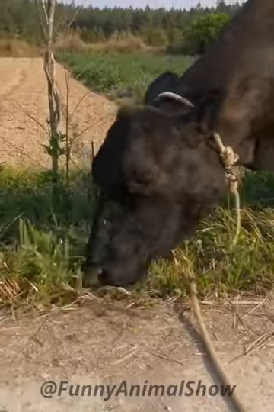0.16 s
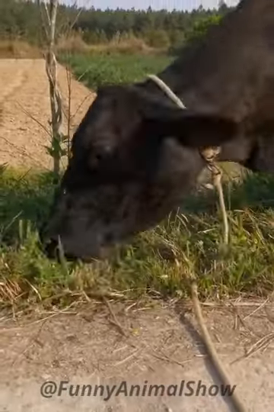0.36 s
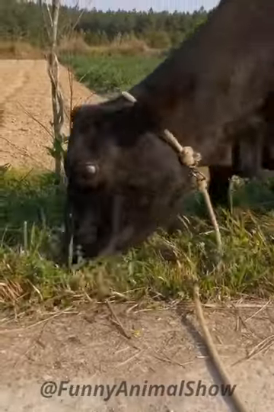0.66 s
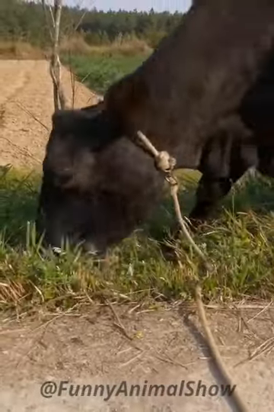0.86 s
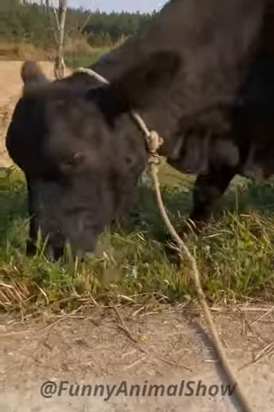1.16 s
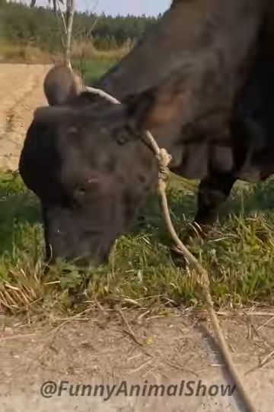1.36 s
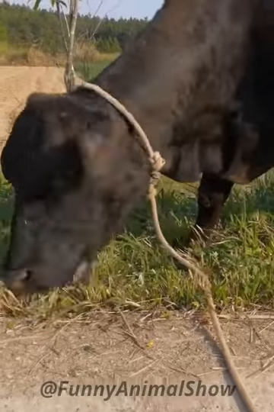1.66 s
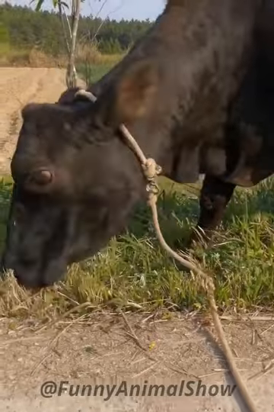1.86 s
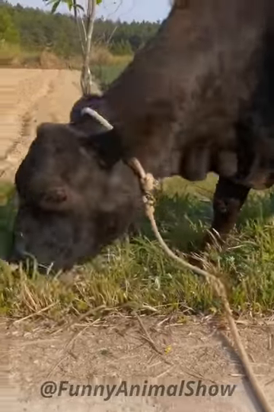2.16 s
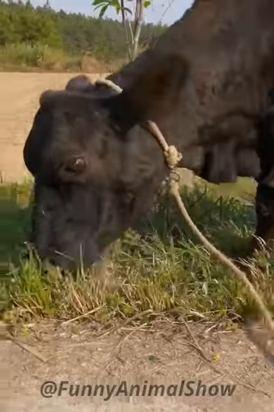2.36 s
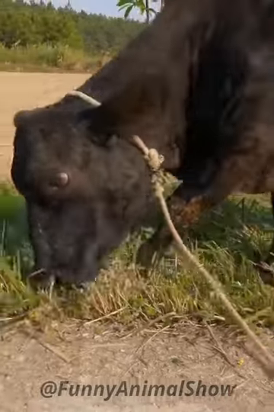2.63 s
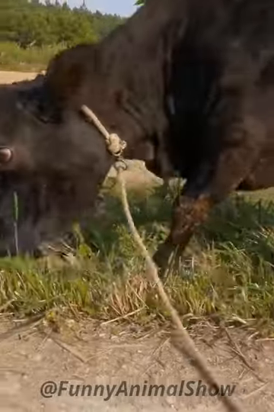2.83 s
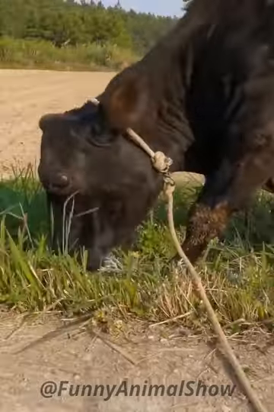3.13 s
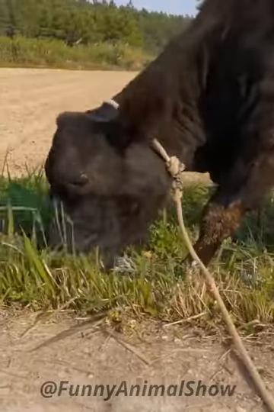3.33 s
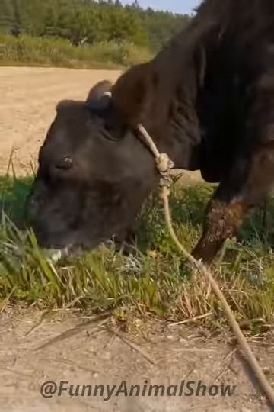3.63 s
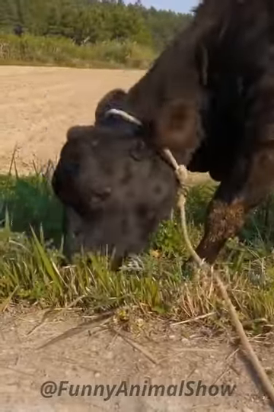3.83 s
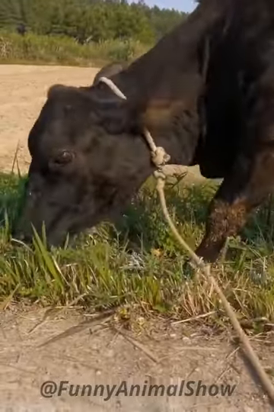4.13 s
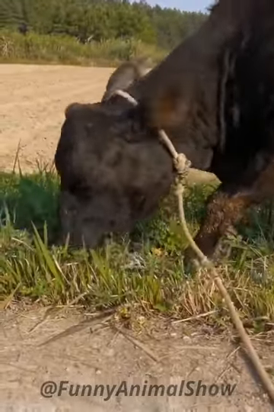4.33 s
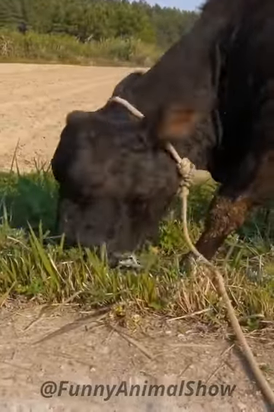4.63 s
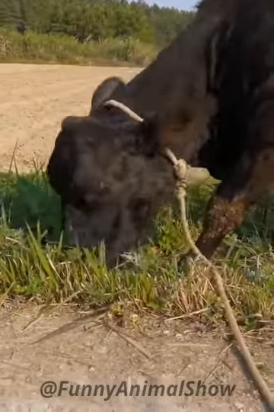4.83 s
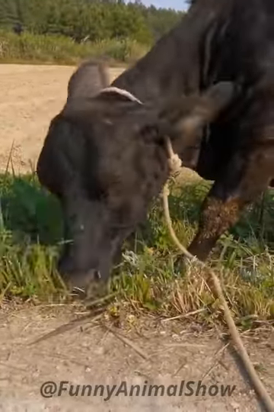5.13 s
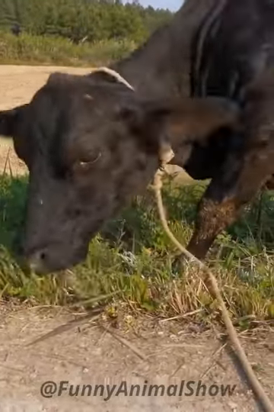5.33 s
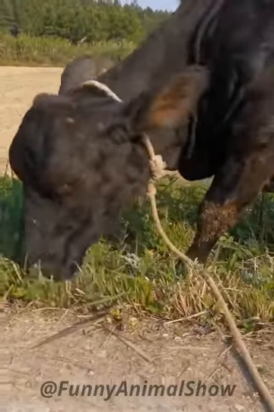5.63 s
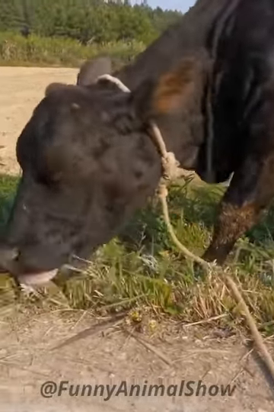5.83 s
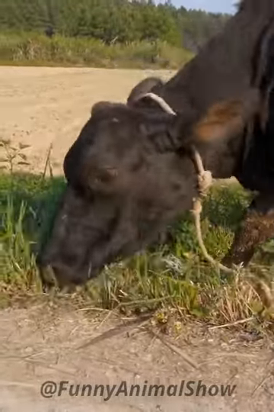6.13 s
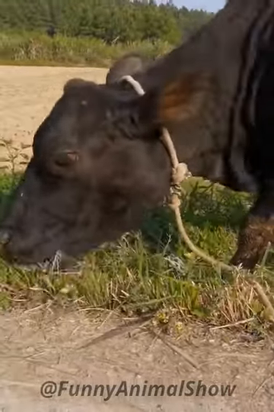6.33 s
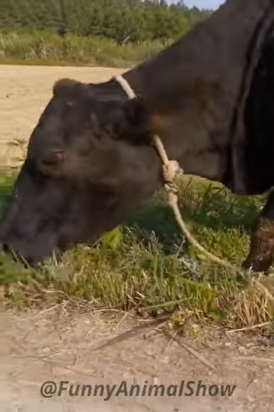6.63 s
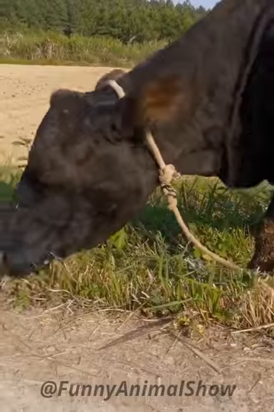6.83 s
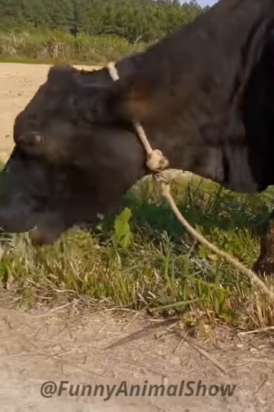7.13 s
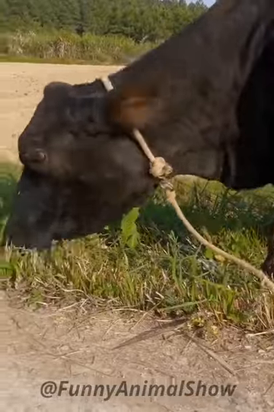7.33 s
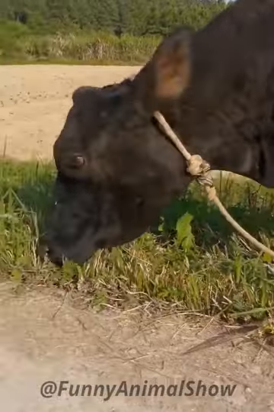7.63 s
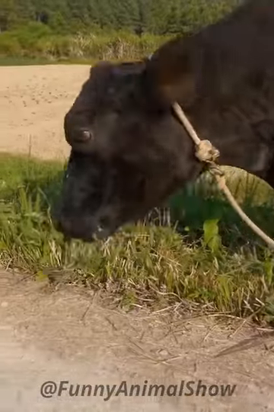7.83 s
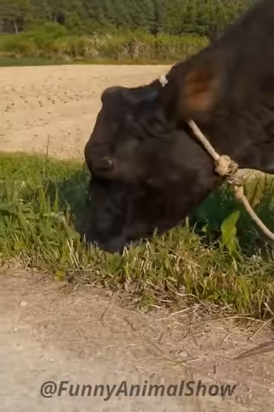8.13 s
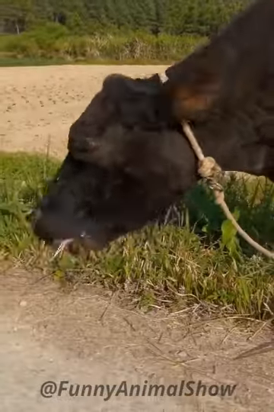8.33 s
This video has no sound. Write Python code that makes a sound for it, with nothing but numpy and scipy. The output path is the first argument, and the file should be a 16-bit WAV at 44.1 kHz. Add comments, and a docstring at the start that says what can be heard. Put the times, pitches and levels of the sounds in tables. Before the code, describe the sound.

Quick, uneven rips and crunches run throughout as a cow crops grass close by, a little to the left. Bright cracks of breaking stalks, hollow root pops and soft jaw bumps punctuate the tearing, with rustling blades in between and low puffs of breath from the animal's nose roughly every second. The field is open and free of echo, with only faint air, stirring grass and a light wind rumble on the microphone behind the feeding.

```python
"""A cow grazes close by in an open field. From the start it tears off tufts, two or three a second:
each rip is a crowd of snapping fibres with a crunch in the mouth, and between rips the muzzle sweeps
through the blades. Near 0.5 s a thick stalk cracks sharply and the nostrils begin to blow into the turf,
about once a second. More stalks splinter, roots pop and the jaw thuds softly; the strongest pop and thud
land at 6.8 s, the last rip at 8.4 s. Faint air, stirring grass and a low breeze lie under it all."""
import sys
import numpy as np
from scipy import signal
from scipy.fft import rfft, irfft, next_fast_len
from scipy.io import wavfile
from scipy.ndimage import uniform_filter1d, map_coordinates

SR = 44100
rng = np.random.default_rng(int(sys.argv[2]) if len(sys.argv) > 2 else 0)


def wav_record(signal):
    """Record a signal, one row per channel, as 16-bit PCM in the file named by sys.argv[1]."""
    frames = np.transpose(np.atleast_2d(signal))
    bounded = np.clip(frames, -1, 1)
    # unit amplitude maps onto the largest positive 16-bit level
    quanta = np.round(bounded * 32767).astype(np.int16)
    wavfile.write(sys.argv[1], SR, quanta)


N = 374276

# tufts torn off: (start [s], hold [s], rip level [dB], mouth crunch level [dB])
TUFT_RIPS = [(0.08, 0.013, -43.5, -52), (0.466, 0.04, -35, -45), (0.883, 0.013, -31.5, -52.5),
             (1.293, 0.0044, -32.5, -47.5), (1.463, 0.049, -43.5, -56), (1.666, 0.02, -35, -48.5),
             (2.052, 0.043, -35.5, -45), (2.485, 0.055, -41, -56), (2.896, 0.015, -37, -43.5),
             (3.329, 0.0069, -40, -48), (4.121, 0.062, -40.5, -42), (4.645, 0.038, -43.5, -54.5),
             (4.816, 0.02, -46, -81), (5.038, 0.069, -39, -47), (5.462, 0.039, -33.5, -40.5),
             (5.875, 0.014, -38.5, -53), (6.296, 0.085, -38, -54), (6.771, 0.0049, -35, -47.5),
             (7.163, 0.023, -40.5, -53), (7.552, 0.0078, -37.5, -49.5), (7.922, 0.073, -36, -42.5),
             (8.365, 0.0071, -35.5, -45)]
# thick stalks cracking: (time [s], level [dB], pitch [Hz])
STALK_CRACKS = [(.417, -28, 10000), (0.459, -14, 10200), (0.882, -30, 7450), (1.3026, -20.5, 9500),
                (2.073, -31, 5970), (2.0886, -20.5, 10100), (3.32, -28, 8200), (3.941, -32, 9000),
                (4.13, -29, 6000), (4.184, -28, 7060), (4.832, -36, 9000), (5.025, -30, 4960),
                (5.063, -27, 6960), (5.114, -27.5, 8100), (5.478, -21, 9700), (5.896, -21, 9200),
                (6.334, -27, 8000), (6.752, -26, 4930), (7.166, -33, 7000)]
# tone of breaking stems: (frequency [Hz], level [dB])
STEM_SPECTRUM = [(500, -10), (1100, -0.5), (1500, -4.5), (2200, -4), (2900, 0), (3700, 1.5), (5000, -4),
                 (7500, 2.5), (15000, -18)]
# tone of rustling blades: (frequency [Hz], level [dB])
BLADE_SPECTRUM = [(40, -2), (130, -5.5), (350, -12.5), (900, -6), (1300, -9.5), (2000, -10.5), (2750, -2.5),
                  (3600, -4.5), (4600, -1.5), (8200, -3.5), (9900, 4.5), (11000, -1), (12200, -2),
                  (15700, -6)]


def tearing(hard_pull_db=-33, steepness=1.03):
    """Tension builds until most fibres of the tuft snap at once: bright leaves over deeper stems."""
    # tone of tearing leaves: (frequency [Hz], level [dB])
    leaf_spectrum = [(300, -43), (1000, -12), (1500, -29), (2150, -11.5), (2750, -1), (3600, -10),
                     (4700, 1), (6500, -5), (8200, -7), (9900, 6), (11000, -1.5), (12200, -0.5),
                     (14000, -3.5), (15700, -5.5)]
    pull = strokes([row[:3] for row in TUFT_RIPS], attack_s=0.034, release_s=0.063)
    stem_pull = amp(hard_pull_db) * (pull / amp(hard_pull_db)) ** steepness
    snaps = grains(per_s=1800, spread_db=3.5, life_s=0.0016, smooth=0.44)
    leaves = pull * texture(leaf_spectrum, snaps, patchy_db=5)
    stems = stem_pull * texture(STEM_SPECTRUM, snaps, patchy_db=2)
    return amp(-0.03) * leaves + amp(-7) * stems


def muzzle_sweeps():
    """Blades slide over the muzzle: a soft crackle that eases as the sweep slows."""
    # passes through the grass: (start [s], hold [s], level [dB])
    passes = [(0.286, 0.084, -43), (0.677, 0.046, -43.5), (0.816, 0.19, -46.5), (1.074, 0.091, -46),
              (1.737, 0.2, -47), (2.302, 0.097, -51.5), (2.665, 0.096, -38.5), (2.823, 0.14, -44),
              (3.13, 0.062, -46.5), (3.492, 0.045, -46), (3.607, 0.02, -52), (3.875, 0.13, -43),
              (4.468, 0.36, -59.5), (4.859, 0.042, -50.5), (5.25, 0.11, -42.5), (5.655, 0.1, -46.5),
              (6.062, 0.054, -48), (6.566, 0.096, -54.5), (6.957, 0.077, -53.5), (7.362, 0.086, -48),
              (7.603, 0.051, -48), (7.729, 0.099, -47.5), (8.094, 0.12, -53.5)]
    sweep = strokes(passes, attack_s=0.064, release_s=0.077, sag_db_per_s=8.5)
    crackle = grains(per_s=900, spread_db=4.5, life_s=0.0023, smooth=1.2)
    return amp(0.73) * sweep * texture(BLADE_SPECTRUM, crackle, patchy_db=3.5)


def stalk_cracks(t60_s=0.004, log_width=0.25):
    """A thick stalk gives one bright crack, a burst of noise around its own pitch."""
    cracks = np.zeros((2, N + SR))
    t = np.arange(SR // 20) / SR
    hz = np.fft.rfftfreq(len(t), 1 / SR)
    for start, db, pitch_hz in STALK_CRACKS:
        band = 1 / (1 + (np.log((hz + 1) / pitch_hz) / log_width) ** 2)
        noise = rng.standard_normal((2, len(t)))
        burst = unit(irfft(rfft(noise) * band, len(t)))
        cracks[:, round(start * SR):][:, :len(t)] += burst * amp(db - 60 * t / t60_s)
    return filtered(cracks[:, :N], muzzle_pan)


def splinters(t60_s=0.13, offset_db=-18, ceiling_db=-34):
    """Once a stalk has cracked, its neighbours take the load and split in a sudden, dying crackle."""
    tails = np.zeros(N + SR)
    t = np.arange(SR // 4) / SR
    for start, db, _ in STALK_CRACKS:
        onset_db = min(db + offset_db, ceiling_db)
        tails[round(start * SR):][:len(t)] += amp(onset_db - 60 * t / t60_s)
    splits = grains(per_s=900, spread_db=7, life_s=0.0005, smooth=0.3)
    return amp(-1.5) * tails[:N] * texture(STEM_SPECTRUM, splits, patchy_db=3)


def mouth_crunch():
    """The mouth booms with the breaking fibres for as long as each rip lasts."""
    # tone of the crunch: (frequency [Hz], level [dB])
    crunch_spectrum = [(30, -29), (90, -4.5), (190, -0.5), (360, -7.5), (520, -1.5), (690, 0), (1000, -7.5),
                       (1500, -10.5), (2200, -17.5), (5000, -26)]
    bites = [(start, hold, db) for start, hold, _, db in TUFT_RIPS]
    bite = strokes(bites, attack_s=0.073, release_s=0.047)
    breaks = grains(per_s=500, spread_db=2.5, life_s=0.002, smooth=0.54)
    return amp(2) * bite * texture(crunch_spectrum, breaks, patchy_db=5)


def root_pops(firm_db=-20, softening=0.97, jerks=3, step_db=-7, gap_s=0.0055, lowpass_hz=2500):
    """Roots give way in a few quick jerks that ring the mouth cavity; gentle pops are duller."""
    # hollow pops of roots and lips: (time [s], level [dB], cavity pitch [Hz])
    pops = [(.08, -31, 570), (0.473, -30, 500), (1.289, -28.5, 716), (1.486, -32, 520), (1.675, -35, 620),
            (2.032, -35, 796), (2.093, -27, 617), (2.908, -27, 680), (3.432, -37.5, 644), (3.675, -40, 500),
            (4.185, -38, 730), (5.325, -32.5, 620), (5.496, -22.5, 690), (5.605, -43, 905),
            (6.378, -29.5, 660), (6.754, -26.5, 760), (6.7757, -19.5, 720), (7.165, -29.5, 825),
            (7.943, -25, 735), (8.366, -30.5, 740)]
    # mouth resonances: (ratio to cavity pitch [-], bandwidth [Hz], level [dB])
    mouth_modes = [(.33, 130, -17), (1, 210, -2.5), (1.95, 547, 1.5)]
    rings = np.zeros(N + SR)
    t = np.arange(SR // 20) / SR
    for start, db, pitch_hz in pops:
        ring = np.zeros(len(t))
        for ratio, width_hz, mode_db in mouth_modes:
            tilt_db = softening * (db - firm_db) * max(np.log2(ratio), 0)
            decay = np.exp(-np.pi * width_hz * t)
            ring += amp(mode_db + tilt_db) * decay * np.sin(2 * np.pi * pitch_hz * ratio * t)
        waits = gap_s * rng.uniform(0.477, 1.5, jerks)
        for jerk, delay in enumerate(np.cumsum(waits) - waits[0]):
            rings[round((start + delay) * SR):][:len(t)] += amp(db + jerk * step_db) * ring
    return filtered(rings[:N], lambda hz: muzzle_pan(hz) / (1 + 1j * hz / lowpass_hz))


def nostril_blows(attack_s=0.079, release_s=0.16):
    """Breath flutters in the turf as a low rush that eases off, with a hollow hiss on top."""
    # breaths out: (start [s], hold [s], rumble level [dB], hiss level [dB])
    blows = [(0.51, 0.062, -48.5, -62), (1.276, 0.11, -49, -61.5), (2.186, 0.29, -55.5, -64.5),
             (3.22, 0.092, -50, -55.5), (3.566, 0.15, -64.5, -66), (3.936, 0.2, -52, -55.5),
             (5.026, 0.19, -48, -51), (5.935, 0.24, -48.5, -54.5), (6.911, 0.2, -57, -65),
             (7.828, 0.083, -46.5, -49.5)]
    # tones of the low rush and of the hiss: (frequency [Hz], level [dB])
    rumble_spectrum = [(25, -32), (60, -3.5), (100, 2), (200, -0.5), (330, -8.5), (520, -12.5), (800, -36),
                       (2000, -54)]
    hiss_spectrum = [(150, -26), (330, -1), (560, 4.5), (720, 0), (950, -6.5), (1400, -14), (2200, -13.5),
                     (6000, -19)]
    flutter = grains(per_s=170, spread_db=1.5, life_s=0.014, smooth=0.94)
    rumble_gain = strokes([row[:3] for row in blows], attack_s, release_s, sag_db_per_s=18)
    hiss_gain = strokes([(start, hold, db) for start, hold, _, db in blows], attack_s, release_s)
    rumble = rumble_gain * texture(rumble_spectrum, flutter, patchy_db=3)
    hiss = hiss_gain * texture(hiss_spectrum, flutter, patchy_db=4)
    return amp(1.5) * rumble + amp(2) * hiss


def jaw_thuds(t60_s=0.061, attack_s=0.0082):
    """Jaw and muzzle bump the turf: a few cycles of a low, heavily damped ring."""
    # soft bumps: (time [s], level [dB], pitch [Hz])
    bumps = [(0.701, -47, 120), (1.04, -48.5, 83), (1.289, -37, 100), (1.479, -38, 195), (3.301, -42, 108),
             (5.149, -44, 99), (5.959, -38, 106), (6.377, -43, 178), (6.776, -33.5, 189)]
    thuds = np.zeros(N + SR)
    t = np.arange(SR // 4) / SR
    for start, db, pitch_hz in bumps:
        envelope = amp(db - 60 * t / t60_s) * (1 - np.exp(-t / attack_s))
        thuds[round(start * SR):][:len(t)] += envelope * np.sin(2 * np.pi * pitch_hz * t)
    return amp(9) * thuds[:N]


def stirring_grass():
    """The blades never quite stop moving: a faint bed of rustle and ticks."""
    ticks = grains(per_s=150, spread_db=5, life_s=0.001, smooth=1.2)
    return amp(-66) * texture(BLADE_SPECTRUM, ticks, patchy_db=3.5)


def breeze(rest_db=-65.5, gust_db=2.5, tug_offset_db=-8.5):
    """Air buffets the microphone ports: a deep rumble that gusts and swells with each tug of the head."""
    # tone of the buffeting: (frequency [Hz], level [dB])
    buffet_spectrum = [(8, -23), (22, -7.5), (45, -13.5), (90, -18.5), (250, -33)]
    noise = rng.standard_normal((2, N))
    buffet = unit(filtered(noise, lambda hz: amp(along(buffet_spectrum, hz))))
    tugs = [(start, hold, db + tug_offset_db) for start, hold, _, db in TUFT_RIPS]
    swell = strokes(tugs, attack_s=0.17, release_s=0.17)
    gusts = amp(rest_db + gust_db * wobble(per_s=3))
    return np.hypot(gusts, swell) * buffet * amp([[1], [-4]])  # leans left


def open_air():
    """A faint, dark wash of outdoor air."""
    # tone of the air: (frequency [Hz], level [dB])
    air_spectrum = [(25, 4.5), (120, -5), (330, -9), (600, -10), (1100, -9.5), (1900, -23.5), (3000, -16),
                    (7000, -30), (10000, -16), (15700, -32)]
    return amp(-66) * texture(air_spectrum, patchy_db=5)


def strokes(rows, attack_s, release_s, sag_db_per_s=0):
    """Envelope of (start [s], hold [s], level [dB]) strokes; attack and release each span 20 dB."""
    t = np.arange(0, N / SR, 1 / 2000)
    power = np.zeros(len(t))
    for start, hold, db in rows:
        fade = np.maximum((start - t) / attack_s, (t - start - hold) / release_s)
        sag_db = sag_db_per_s * np.clip(t - start, 0, hold)
        power += amp(db - 20 * np.maximum(fade, 0) - sag_db) ** 2
    return np.interp(np.arange(N) / SR, t, np.sqrt(power))


def grains(per_s, spread_db, life_s, smooth):
    """Envelope of tiny bursts, random in time and size, over a smooth share of friction."""
    onsets = rng.random(N) < per_s / SR
    sizes = amp(spread_db * np.clip(rng.standard_normal(N), -2, 2))
    energy = signal.lfilter([1], [1, -np.exp(-1 / (life_s * SR))], (onsets * sizes) ** 2)
    return np.sqrt(energy / energy.mean() + smooth)


def texture(spectrum, grain=1, patchy_db=0):
    """Grainy, coloured stereo noise of rms 1, leaning left: narrow in the bass, wide in the treble."""
    # stereo likeness: (frequency [Hz], left-right correlation [-])
    likeness = [(60, 0.6), (130, 0.79), (290, 0.83), (640, 0.47), (1400, 0.39), (3100, 0.36), (7000, 0.027)]

    def mid_side_gains(hz):
        width = np.arccos(np.clip(along(likeness, hz), -1, 1)) / 2
        return amp(along(spectrum, hz)) * [np.cos(width), np.sin(width)]
    noise = patches(rng.standard_normal((2, N)), patchy_db)
    mid, side = filtered(noise * grain, mid_side_gains)
    return unit(filtered(np.array([mid + side, mid - side]), muzzle_pan))


def patches(x, patchy_db, bins=4, frames=3):
    """Each blade or cavity adds its own colour: random gains on small patches of frequency and time."""
    spectrogram = signal.stft(x, nperseg=1024)[2]
    colour = uniform_filter1d(rng.standard_normal(spectrogram.shape), bins, axis=1)
    colour = uniform_filter1d(colour, frames, axis=2)
    return signal.istft(spectrogram * amp(patchy_db * unit(colour)), nperseg=1024)[1][:, :N]


def muzzle_pan(hz):
    """Left and right gains that place a sound at the muzzle, off to the left."""
    # stereo balance: (frequency [Hz], left minus right [dB])
    balance = [(100, 1.7), (380, 2), (700, 5.5), (1300, 4), (2400, -2), (4400, 3), (8100, 5.5), (10000, 18),
               (15000, 9.5)]
    pair = amp(np.outer([0.5, -0.5], along(balance, hz)))
    return pair / np.sqrt(np.mean(pair ** 2, axis=0))


def wobble(per_s):
    """A smooth random curve with per_s knots a second."""
    knots = rng.standard_normal(int(N * per_s / SR) + 4)
    return map_coordinates(knots, [np.arange(N) * per_s / SR])


def filtered(x, response):
    """Equalise x with a gain given as a function of frequency."""
    size = next_fast_len(N + SR // 2)
    return irfft(rfft(x, size) * response(np.fft.rfftfreq(size, 1 / SR)), size)[..., :N]


def along(points, hz):
    """Read a curve of (frequency [Hz], value) points on a log frequency axis."""
    point_hz, values = np.transpose(points)
    return np.interp(np.log(hz + 1), np.log(point_hz + 1), values)


def amp(db):
    """Decibels to gain."""
    return 10 ** (np.asarray(db) / 20)


def unit(x):
    """Scale to rms 1."""
    return x / np.sqrt(np.mean(x ** 2) + 1e-20)


def scene():
    """The cow in the open, with no walls to answer; the grass sounds follow its swinging head."""
    # where the muzzle is: (time [s], leftward lean [dB])
    head_path = [(0, 9.5), (1.25, 13.5), (1.65, 10), (2.9, 9.5), (3.2, 14), (3.65, 9.5), (4.6, 13),
                 (5.5, 12), (6.2, 8), (7.23, 12.5), (8.49, 7.5)]
    swing_db = np.interp(np.arange(N) / SR, *np.transpose(head_path))
    swing_db -= swing_db.mean()
    head_pan = amp(np.outer([0.15, -0.7], swing_db))
    grass = tearing() + muzzle_sweeps() + stalk_cracks() + splinters()
    cow = mouth_crunch() + root_pops() + nostril_blows() + jaw_thuds()
    field = stirring_grass() + breeze() + open_air()
    return grass * head_pan + cow + field


def record(dry):
    """A brick-wall low-pass takes off the very top of the treble."""
    return filtered(dry, lambda hz: hz < 15750)


dry = scene()
out = record(dry)
wav_record(out)
```